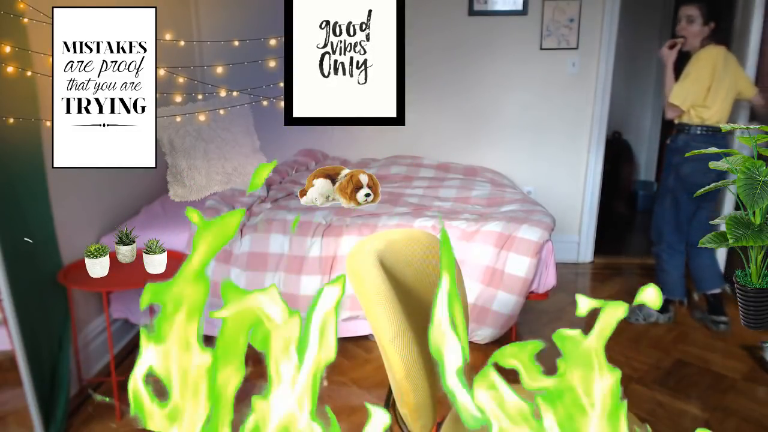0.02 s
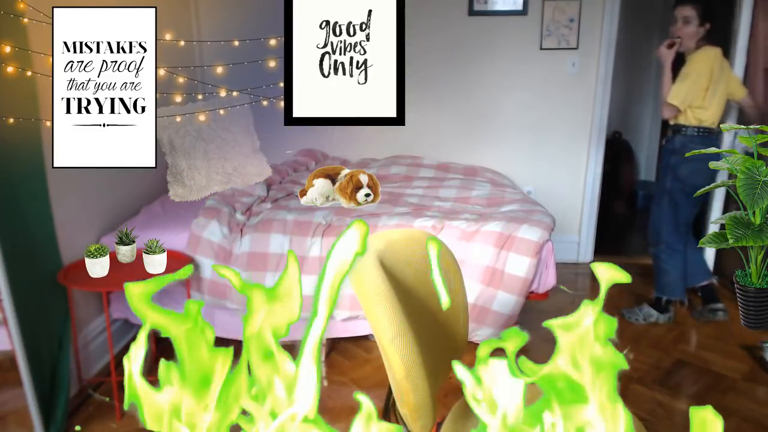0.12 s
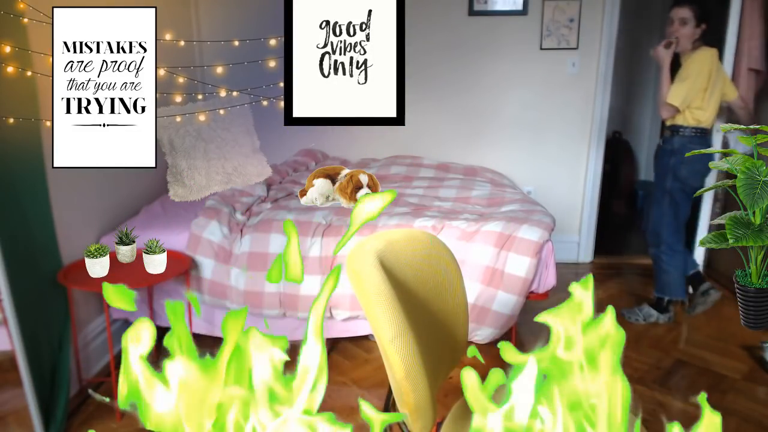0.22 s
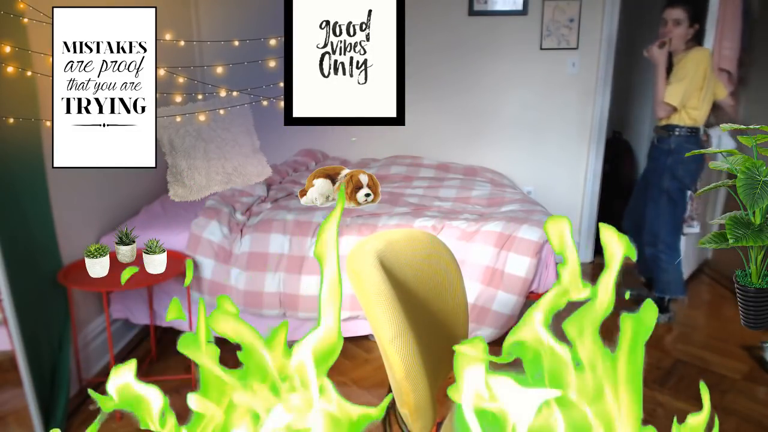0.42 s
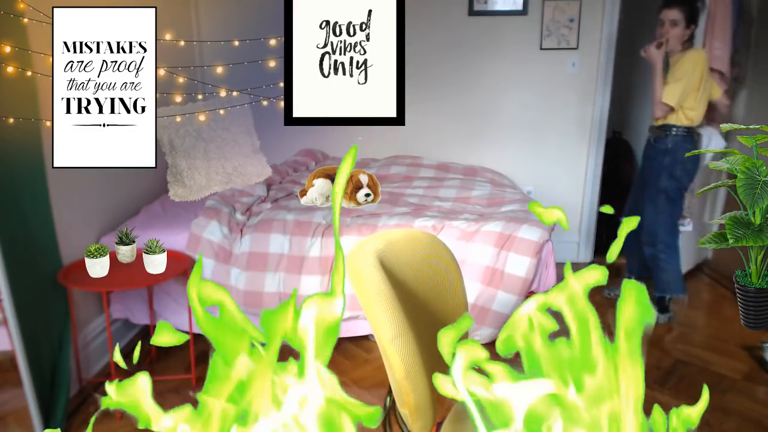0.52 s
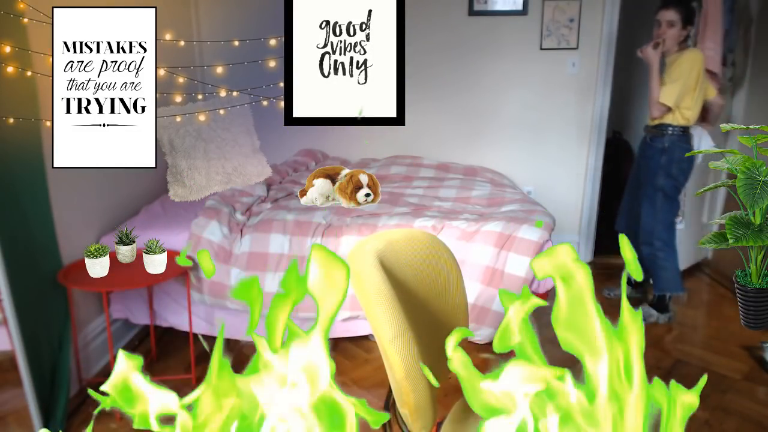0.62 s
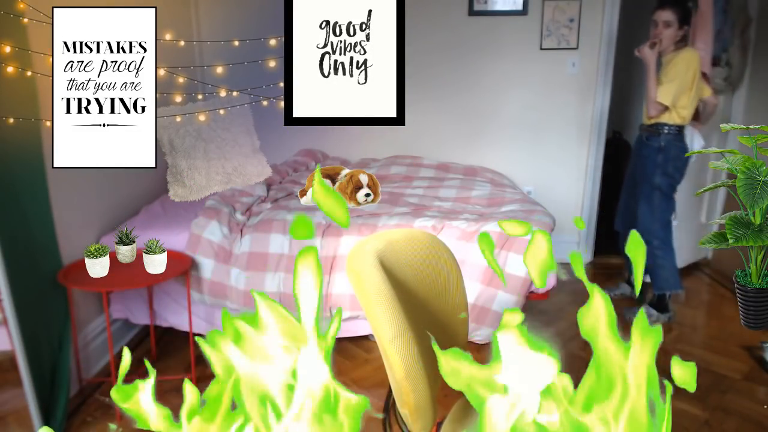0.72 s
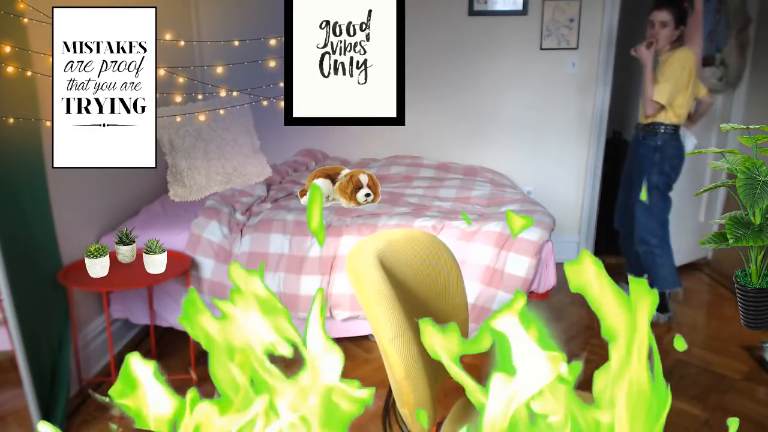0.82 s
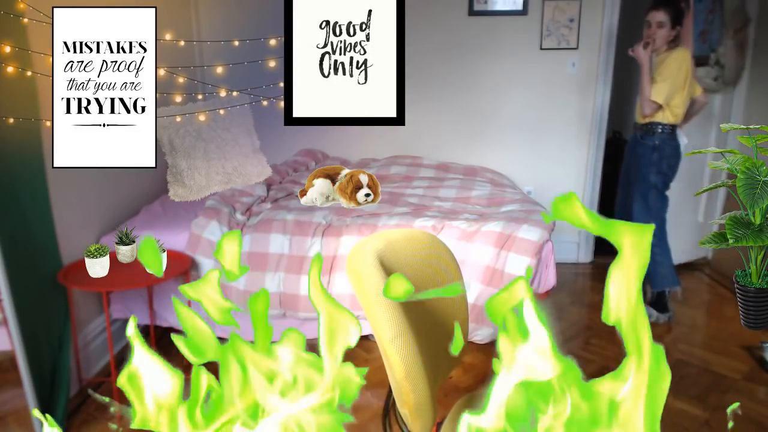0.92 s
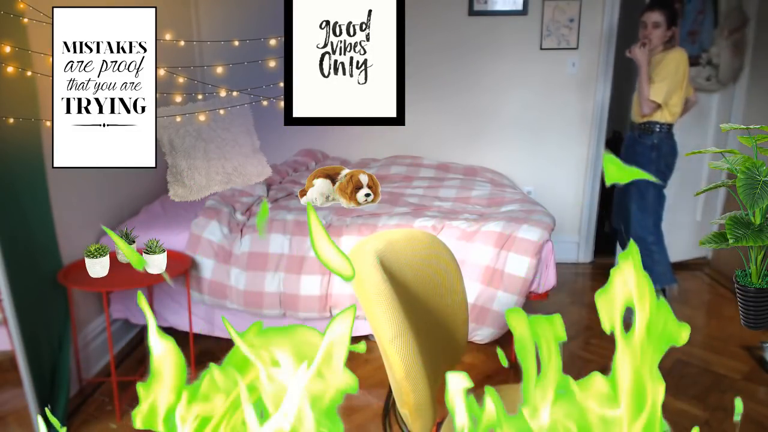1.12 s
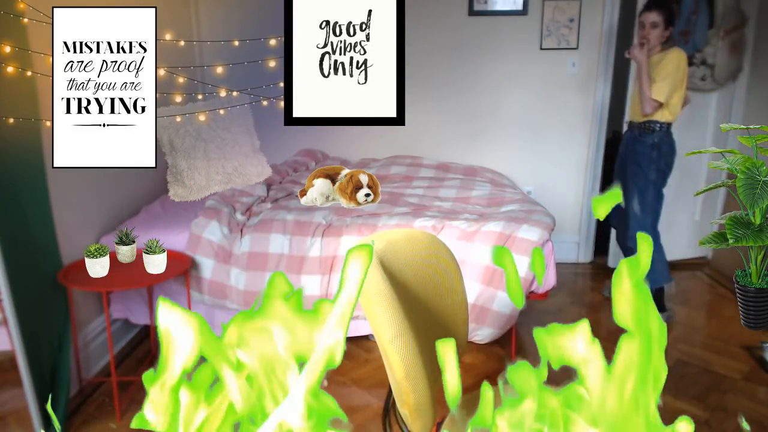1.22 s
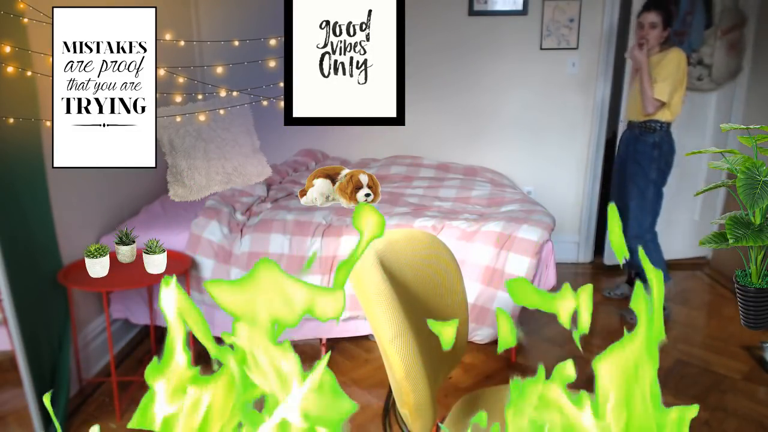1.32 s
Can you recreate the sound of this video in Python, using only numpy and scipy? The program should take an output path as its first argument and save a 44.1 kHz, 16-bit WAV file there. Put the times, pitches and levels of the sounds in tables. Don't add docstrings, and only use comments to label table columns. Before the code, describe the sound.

Metal door latch clicks with a bright snap, followed by a brief sole slide, a stuttering gritty drag and one short final knock, heard in a small lively room through a thin, noise-suppressed laptop microphone.

```python
import sys
import numpy as np
from scipy import signal
from scipy.fft import rfft, irfft
from scipy.io import wavfile
from scipy.ndimage import uniform_filter1d

SR = 44100
rng = np.random.default_rng(int(sys.argv[2]) if len(sys.argv) > 2 else 0)


def elevation(decibels):
    levels = np.asarray(decibels, float)
    return 10 ** (levels / 20)


def transcribe(u):
    v = np.clip(np.atleast_2d(u).T, -1, 1)
    q = np.round(v * 32767).astype(np.int16)
    wavfile.write(sys.argv[1], SR, q)


N = 61740


def read(table, hz):
    f, value = np.array(table, float).T
    return np.interp(np.log(np.maximum(hz, 1)), np.log(f), value)


def colour(x, table):
    log_gain = read(table, np.fft.rfftfreq(4096, 1 / SR)) * np.log(10) / 20
    cepstrum = irfft(log_gain)
    cepstrum[1:2048] *= 2
    cepstrum[2049:] = 0
    h = irfft(np.exp(rfft(cepstrum)))
    return signal.fftconvolve(x, h / np.sqrt(np.sum(h ** 2)))[:len(x)]


def ring(x, modes, longest_s=0.1):
    t = np.arange(SR // 4) / SR
    h = np.zeros(len(t))
    for hz, db, t60 in modes:
        t60 = np.clip(t60, 0.002, longest_s)
        fade = 1000. ** (-t / t60) * (1 - np.exp(-20 * t / t60))
        h += elevation(db) * np.sin(2 * np.pi * hz * t) * fade / np.sqrt(t60)
    return signal.fftconvolve(x, h / np.sqrt(np.sum(h ** 2)))[:N]


def grit(rough_db):
    x = rng.standard_normal(N) * elevation(rough_db * rng.exponential(size=N))
    return x / x.std()


def bursts(rows, edge_s):
    t = np.arange(N) / SR
    envelope = np.zeros(N)
    for start, length, db in rows:
        envelope += elevation(db) * np.clip(np.minimum(t - start, start + length + edge_s - t) / edge_s, 0, 1)
    return envelope


# t/s, length/s, crack level/dB, plate ring level/dB
CLACKS = [
    (0.1831, .0015, -40.5, -38),
    (0.185, 0.026, -45, -48),
    (0.2164, 0.0067, -43, -45),
    (0.2247, .027, -28, -34),
]
# f/Hz, level per Hz/dB
CRACK_COLOUR = [(300, -36), (1000, -26.5), (1500, -22.5), (2520, -5.5), (3340, -10.5), (4070, -10.5),
                (5390, -5.5), (15500, -13.5)]
# f/Hz, level/dB, t60/s
PLATE_MODES = [(1876, -21, 0.015), (1990, 5.5, 0.0094), (2300, -4, 0.014), (2592, 3, 0.054),
               (2907, 7, 0.011), (4320, -5.5, 0.03), (5190, -7, 0.0036)]
# t/s, length/s, level/dB
SLIDES = [
    (.195, .014, -44),
    (.207, 0.0108, -38),
    (.2185, 0.0085, -28),
]


def latch():
    contact = grit(1.8)
    crack_rows = [(s, length, crack_db) for s, length, crack_db, _ in CLACKS]
    plate_rows = [(s, length, plate_db) for s, length, _, plate_db in CLACKS]
    crack = colour(contact * bursts(crack_rows, 0.00058), CRACK_COLOUR)
    plate = ring(contact * bursts(plate_rows, 0.0006), PLATE_MODES, 0.025)
    slide = colour(grit(0.98) * bursts(SLIDES, 0.0021), SWISH_COLOUR)
    return crack + plate + slide


# t/s, length/s, level/dB
RUBS = [
    (.113, 0.02, -45.5),
]
# f/Hz, level/dB, t60/s
SPRING_MODES = [(3768, -15, .03), (4926, -13, .03), (5400, -12, .02), (6800, 0, .02), (8355, 1, .04),
                (9700, -16, .02), (12200, -17, .02)]
# t/s, length/s, level/dB
BRUSH = [
    (.099, .014, -64),
]
# f/Hz, level/dB, t60/s
BRUSH_MODES = [(8700, 0, .015), (9700, -5, .01), (13500, -6, .015), (14500, -2, .02)]
# t/s, length/s, level/dB
KNOCKS = [
    (.124, .02, -47.5),
    (.148, 0.02, -51),
    (.228, 0.0263, -42),
]
# f/Hz, level/dB, t60/s
PANEL_MODES = [(600, -1, .035), (710, 0, .04), (826, -6, .03), (1280, -11, .04), (2100, -20, .015)]
# t/s, length/s, level/dB
TURN = [
    (.122, 0.045, -57),
]
# f/Hz, level per Hz/dB
TURN_COLOUR = [(400, -15), (1500, -18), (2300, 2), (3700, -3), (5000, -2), (6000, -32.5), (9000, -25),
               (12000, -20)]
# t/s, f/Hz, level/dB
TINGS = [
    (.016, 11600, -66),
    (.017, 15300, -68),
    (1.383, 11200, -67),
    (1.385, 14500, -65),
]


def handle():
    t = np.arange(N) / SR
    squeak = ring(grit(4.3) * bursts(RUBS, 0.0019), SPRING_MODES)
    brush = ring(grit(5.4) * bursts(BRUSH, 0.0039), BRUSH_MODES)
    knock = ring(grit(2.53) * bursts(KNOCKS, 0.002), PANEL_MODES)
    scrape = colour(grit(3.4) * bursts(TURN, 0.0027), TURN_COLOUR)
    tings = np.zeros(N)
    for start, hz, db in TINGS:
        fade = (t > start) * np.exp(-np.abs(t - start) / 0.008)
        tings += elevation(db) * np.sin(2 * np.pi * hz * t) * fade
    return squeak + brush + knock + scrape + tings


# t/s, length/s, level/dB
BUMPS = [
    (.950, 0.0023, -33),
    (.9525, 0.00696, -34),
    (.9598, 0.0065, -30),
    (.975, 0.0022, -47),
]
# f/Hz, level per Hz/dB
BUMP_COLOUR = [(300, -26), (450, -15.5), (900, -8.5), (1640, -7), (2790, 0.5), (5760, -5.5), (10600, -3.5),
               (15500, -9.5)]
# t/s, length/s, level/dB
HEEL = [
    (.951, 0.014, -49.5),
]
# f/Hz, level/dB, t60/s
BOARD_MODES = [(214, -5, 0.15), (488, -0.5, 0.043), (1065, -12, 0.028)]


def bump():
    knock = colour(grit(2.5) * bursts(BUMPS, 0.00059), BUMP_COLOUR)
    return knock + ring(grit(1.9) * bursts(HEEL, 0.0016), BOARD_MODES)


# centre t/s, level/dB
SLIPS = [(.542, -64), (0.55, -43.5), (.569, -44), (0.588, -44.5), (0.61, -44), (.618, -50), (0.635, -43.5),
         (0.653, -46), (0.671, -45), (0.679, -47.5), (0.704, -54), (0.711, -44), (0.731, -49),
         (0.743, -42.5), (.759, -42.5), (0.778, -46.5), (0.794, -44.5), (0.816, -42), (0.835, -45.5),
         (.846, -51.5), (.873, -59), (0.883, -46.5), (.897, -76), (0.923, -56.5), (0.929, -48)]
# f/Hz, level per Hz/dB
DRAG_COLOUR = [(180, -25), (300, -23), (535, -14.5), (1280, -8.5), (1560, -12.5), (3180, 4), (6150, -6.5),
               (7750, 1.5), (15500, -6.5)]
# f/Hz, width/Hz, level/dB
DRAG_PEAKS = [(850, 300, -5), (1290, 170, 6), (2500, 500, 0), (3200, 600, -1), (4300, 800, -3),
              (5200, 450, -1), (7700, 700, 0), (9250, 700, -2), (10700, 700, -4), (14400, 800, -4)]


def slip_puffs(length_s):
    t = np.arange(N) / SR
    power = np.zeros(N)
    for centre, db in SLIPS:
        power += elevation(2 * db) * np.cos(np.pi * np.clip((t - centre) / length_s, -0.5, 0.5)) ** 2
    return np.sqrt(power)


def drag():
    puff = grit(2.5) * slip_puffs(0.02)
    modes = [(hz, db + 10 * np.log10(width), 1.5 / width) for hz, width, db in DRAG_PEAKS]
    peaks = ring(puff, modes, 0.015)
    spit = colour(grit(3.7) * slip_puffs(0.009), SWISH_COLOUR)
    return colour(puff, DRAG_COLOUR) + elevation(-3.5) * peaks + elevation(-5) * spit


# f/Hz, level per Hz/dB
SWISH_COLOUR = [(180, -61), (300, -49), (708, -1), (1070, -11), (1330, -12), (2980, -11), (5760, -9),
                (7370, -4), (15500, 4.5)]


def swish():
    t = np.arange(N) / SR - 0.419
    rise_s, hold_s, fall_s, scrape_lag_s = 0.022, 0.055, 0.018, 0.026
    closing = (rise_s + hold_s + fall_s - t) / fall_s
    hiss_shape = np.clip(np.minimum(t / rise_s, closing), 0, 1)
    scrape_shape = np.clip(np.minimum((t - scrape_lag_s) / (rise_s + scrape_lag_s), closing), 0, 1)
    hiss = colour(grit(1.1) * hiss_shape, SWISH_COLOUR)
    scrape = colour(grit(0.91) * scrape_shape, DRAG_COLOUR)
    return elevation(-42) * hiss + elevation(-52.5) * scrape


# f/Hz, t60/s
ROOM_T60 = [(200, 0.82), (700, 0.33), (2500, 0.4), (6000, 0.29), (15000, 0.2)]


def room(x, wet_db, share=1):
    n = SR // 2
    t, hz = np.arange(n) / SR, np.fft.rfftfreq(n, 1 / SR)
    spectrum = rfft(rng.standard_normal(n))
    tail = np.zeros(n)
    for centre in 2 ** np.arange(6, 15.):
        band = np.clip(1 - np.abs(np.log2(np.maximum(hz, 1) / centre)), 0, 1)
        tail += irfft(spectrum * band) * 1000. ** (-t / (share * read(ROOM_T60, centre)))
    tail *= np.clip(t / 0.0091, 0, 1)
    return x + elevation(wet_db) * signal.fftconvolve(x, tail / np.sqrt(np.sum(tail ** 2)))[:N]


def mixed_room(x, wet_db, share, turn_s):
    turn = np.arange(N) / SR / turn_s
    total = np.zeros(N)
    for k in range(4):
        weight = np.clip(1 - np.abs((turn - k) % 4 - 1), 0, 1)
        total += room(x * weight, wet_db, share)
    return total


# f/Hz, level per Hz/dB
HISS_COLOUR = [(50, -33), (90, -6.5), (220, -4), (380, -18), (740, -8.5), (950, -19.5), (2400, -18),
               (15500, -27)]
# f/Hz, level/dB
HUM = [(45, -82.5), (120, -72.5), (160, -77), (218, -84.5)]
GATE_DEPTH_DB = 5.5


def floor():
    t = np.arange(N) / SR
    hum = np.zeros(N)
    for hz, db in HUM:
        waver = uniform_filter1d(uniform_filter1d(rng.standard_normal(N), 500), 500)
        hum += elevation(db) * np.sin(2 * np.pi * hz * t) * (1 + 9 * waver)
    hiss = elevation(-65.5) * colour(rng.standard_normal(N), HISS_COLOUR)
    return elevation(GATE_DEPTH_DB) * (hiss + hum)


def scene():
    x = mixed_room(latch(), 0.5, 1, 0.007)
    x = x + mixed_room(handle(), -1.5, 1, 0.01)
    x = x + mixed_room(bump(), 1, 0.9, 0.004)
    x = x + mixed_room(drag(), -2, 0.65, 0.02)
    x = x + mixed_room(swish(), 1.5, 0.65, 0.02)
    x = signal.sosfilt(signal.butter(4, 170, "high", fs=SR, output="sos"), x) + floor()
    dip_hz, dip_width_hz, dip_db = 6050, 900, -7
    b, a = signal.iirpeak(dip_hz, dip_hz / dip_width_hz, fs=SR)
    return (x - (1 - elevation(dip_db)) * signal.lfilter(b, a, x))[None]


def top_cut(x):
    return signal.sosfilt(signal.butter(12, 16820, fs=SR, output="sos"), x)


def record(dry):
    z = signal.stft(dry, nperseg=512)[2]
    power = uniform_filter1d(np.abs(z) ** 2, size=21, axis=1)
    power = uniform_filter1d(power, size=3, axis=2)
    quiet = power[..., -30:-8].mean(axis=2, keepdims=True)
    over_db = 10 * np.log10(power / quiet)
    knee_db, slope = 10, 1.4
    gain_db = np.clip(slope * (over_db - knee_db), -GATE_DEPTH_DB, 0)
    x = signal.istft(z * elevation(gain_db), nperseg=512)[1][:, :N]
    x = signal.sosfilt(signal.ellip(10, 0.2, 60, 15750, fs=SR, output="sos"), x)
    return top_cut(x)


dry = scene()
out = record(dry)
transcribe(out)
```